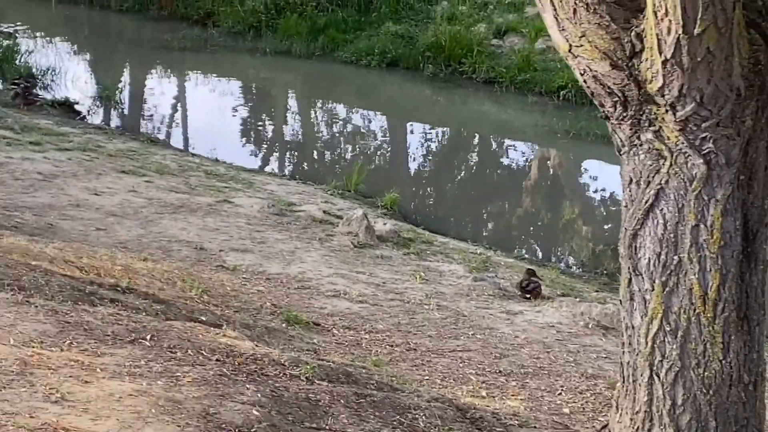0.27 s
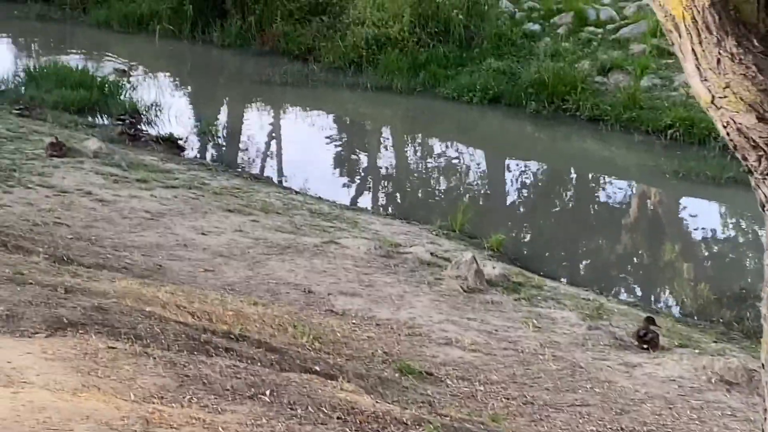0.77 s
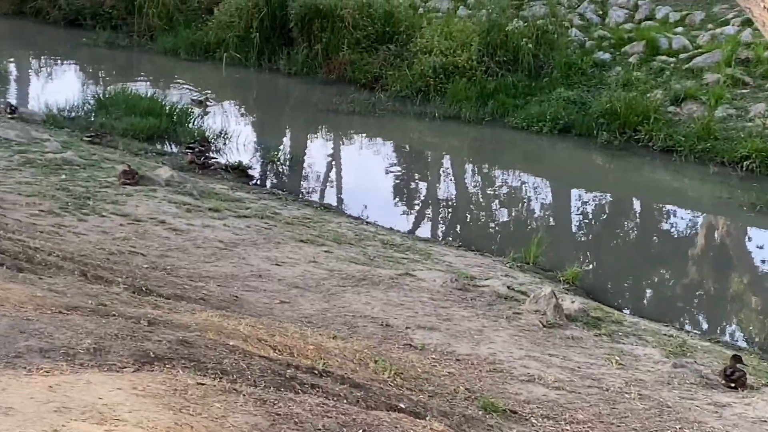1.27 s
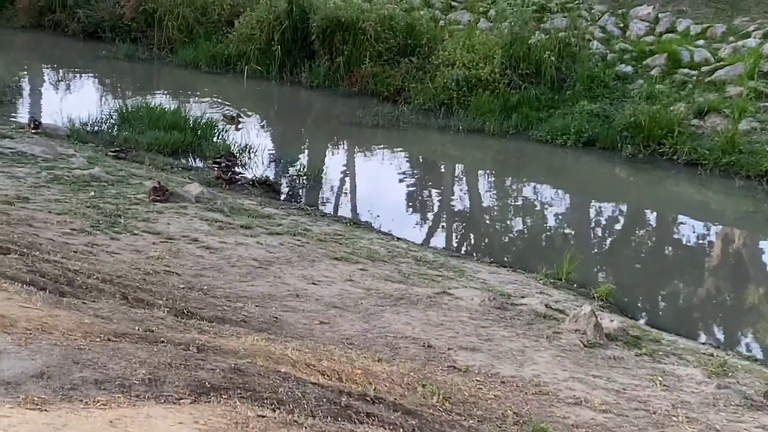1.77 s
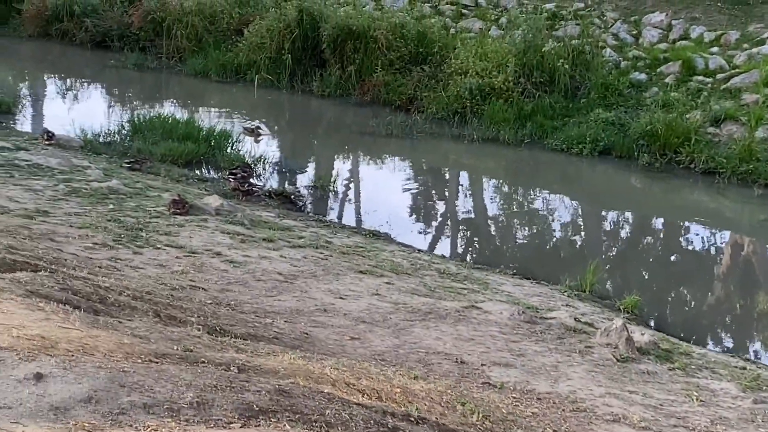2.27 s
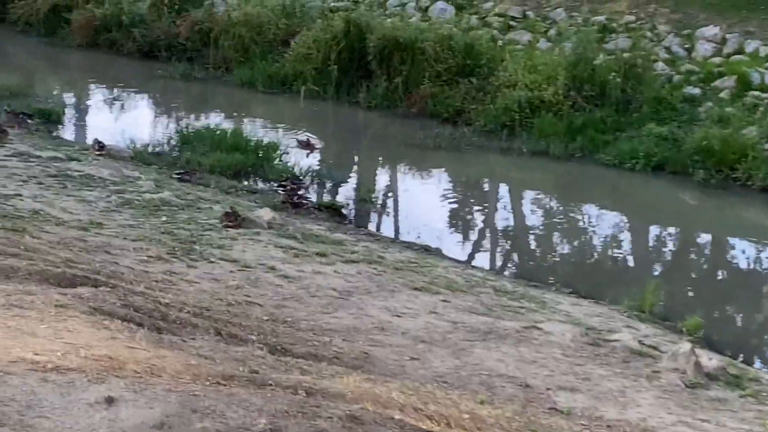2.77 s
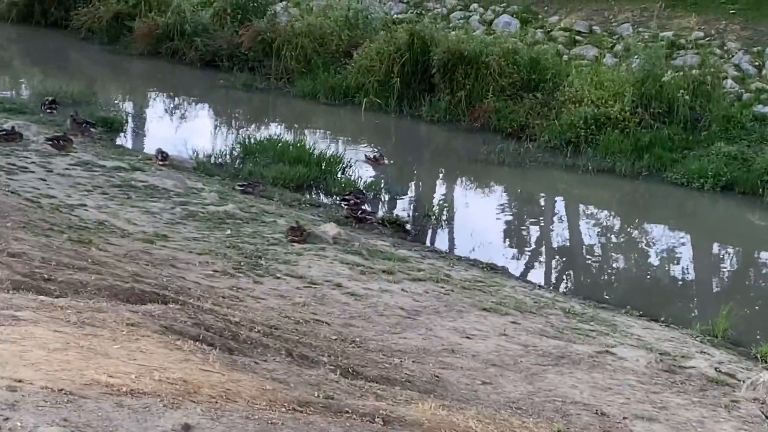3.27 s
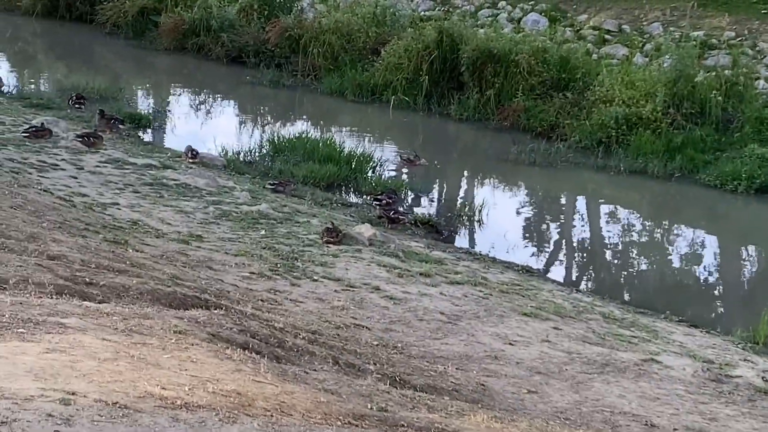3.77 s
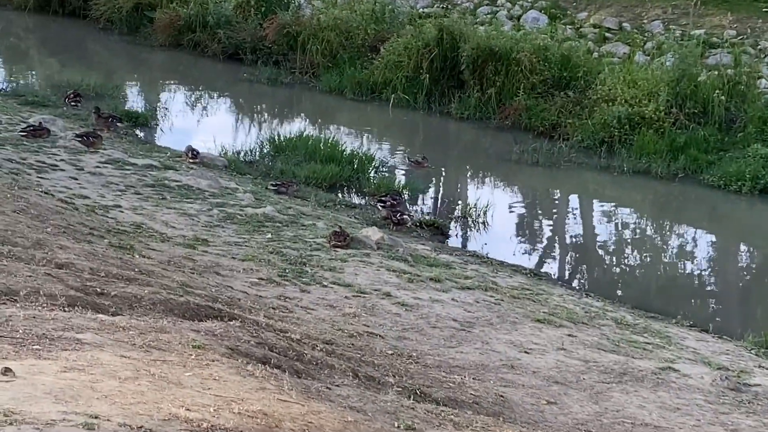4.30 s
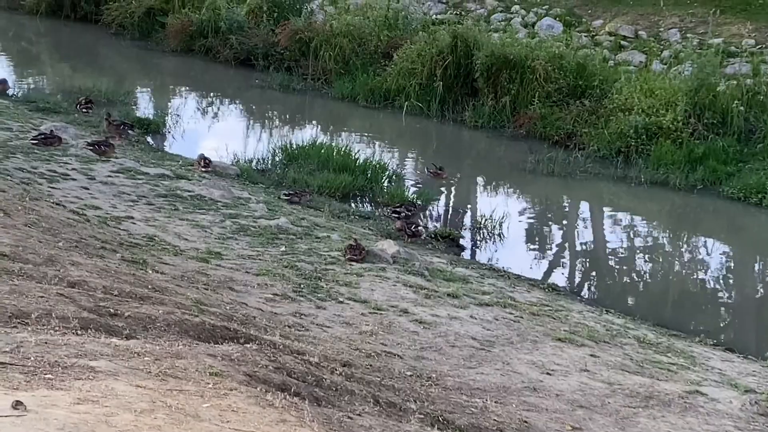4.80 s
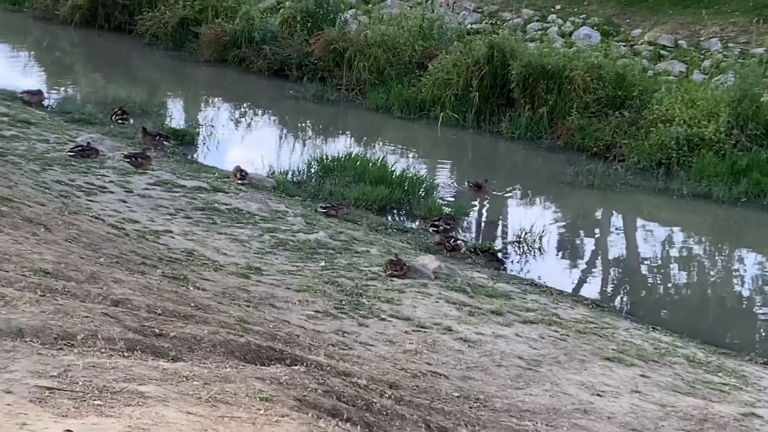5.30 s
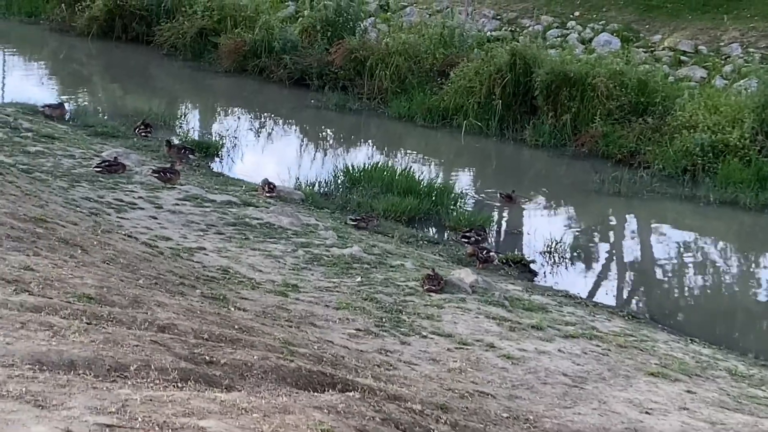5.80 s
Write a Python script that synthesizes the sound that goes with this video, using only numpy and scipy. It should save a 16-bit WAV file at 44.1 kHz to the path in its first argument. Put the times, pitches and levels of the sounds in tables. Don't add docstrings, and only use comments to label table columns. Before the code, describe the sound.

Outdoors on a dry bank beside water, a handheld microphone picks up soft irregular low thuds and close, dry snaps of grit and twigs. Sparrows chirp in quick arched phrases, blurred by echoes from trees. A low fluttering rumble swells and eases over steady far traffic, and a distant lorry revs up slowly and faintly towards the end.

```python
import sys
import numpy as np
from scipy import signal
from scipy.fft import rfft, irfft
from scipy.io import wavfile
from scipy.ndimage import uniform_filter1d

SR = 44100
rng = np.random.default_rng(int(sys.argv[2]) if len(sys.argv) > 2 else 0)


def put_to_file(sound):
    columns = np.atleast_2d(sound).T
    safe = np.clip(columns, -1, 1)
    whole_steps = np.round(safe * 32767)
    wavfile.write(sys.argv[1], SR, whole_steps.astype(np.int16))


def amplitude_ratio(level_db):
    exponent = np.asarray(level_db, float) / 20
    return 10 ** exponent


N = 266760
T = np.arange(N) / SR

# time_s, level_db
RUMBLE_SWELL = [
    (0.0, -33),
    (0.32, -37.5),
    (0.6, -30.5),
    (1.35, -39),
    (2.95, -31.5),
    (3.54, -38.5),
    (4.09, -36),
    (5.71, -39.5),
    (6.05, -36),
]
# pitch_hz, density_db (per Hz)
RUMBLE_COLOUR = [(12, -37.5), (20, -19), (49, 4.5), (76, 3), (126, -4.5), (199, -14), (350, -20.5),
                 (460, -50), (770, -120)]
# time_s, level_db
ROAD_SWELL = [
    (0.0, -45.5),
    (0.29, -46),
    (2.33, -44.5),
    (6.05, -45),
]
# pitch_hz, density_db (per Hz)
ROAD_COLOUR = [(120, -24.5), (200, -4.5), (362, -8.5), (487, -7.5), (573, -11), (948, -3.5), (1200, -10.5),
               (1500, -11.5), (2270, -20), (3870, -22.5), (5780, -28), (6500, -29), (6900, -41)]
# time_s, firing_hz, level_db
LORRY_REVS = [
    (0, 32.83, -48),
    (3.4, 37.04, -55),
    (4.4, 39.13, -49),
    (5.07, 41.54, -43),
    (5.6, 43.07, -50.5),
    (6.05, 44.14, -58),
]
# multiple (of firing_hz), level_db
LORRY_ORDERS = [(3, -14), (4, 2), (5, 1), (6, -2.5), (7, -18.5)]
# start_s, length_s, first_hz, last_hz, level_db
SLIDES = [(0.024, 0.036, 6940, 6440, -57), (0.05, 0.056, 4690, 3930, -56),
          (0.103, 0.046, 4400, 3190, -50.5), (0.174, 0.049, 3150, 4470, -48),
          (.178, 0.043, 3950, 5160, -53.5), (0.312, 0.016, 4700, 5270, -47.5),
          (.326, 0.03, 4500, 5940, -43), (0.933, 0.042, 5210, 4480, -53.5), (1.251, .024, 4400, 4080, -51),
          (1.275, 0.0082, 4300, 3300, -49), (2.713, .035, 4150, 4370, -55.5),
          (1.988, 0.022, 3770, 3900, -44), (2.293, 0.021, 4150, 4070, -44.5),
          (2.298, 0.042, 3450, 3410, -48.5), (2.357, 0.027, 3910, 4280, -49),
          (2.322, 0.045, 2740, 2993, -45.5), (4.894, 0.071, 4860, 4620, -60),
          (5.343, 0.036, 4530, 5030, -58), (5.382, .038, 3230, 4300, -53.5),
          (5.612, 0.041, 6100, 5450, -55), (5.613, 0.03, 4750, 3980, -55.5),
          (5.745, 0.021, 4240, 5330, -51), (5.832, .045, 5120, 4910, -51), (5.906, 0.02, 3240, 4440, -50)]
# start_s, length_s, pitch_hz, level_db
PIPES = [(.07, .045, 6570, -59), (.354, .062, 5980, -51), (.783, .045, 5300, -64), (1.15, .1, 5350, -66),
         (1.29, .06, 5690, -68), (1.37, .024, 4790, -59), (1.662, .04, 6360, -57.5), (1.95, .02, 5650, -58),
         (2.016, .1, 5555, -68), (2.13, .11, 5600, -69), (2.405, .046, 2920, -55), (2.68, .05, 5535, -65),
         (4.775, .04, 5650, -62), (5.128, .13, 5990, -68), (5.3, .026, 5265, -56), (5.299, .03, 6590, -60),
         (5.335, .04, 6600, -59), (5.565, .022, 5580, -63), (5.636, .03, 5590, -50), (5.69, .08, 5600, -61),
         (5.782, .022, 5950, -48.5), (5.8, .07, 6550, -67), (5.94, .03, 5950, -64)]
# start_s, length_s, first_hz, last_hz, level_db
CHATTER = [(0.052, 0.12, 4270, 3540, -48.5), (0.968, 0.14, 4200, 3800, -48),
           (1.268, 0.081, 3870, 3520, -56.5), (1.483, 0.13, 3870, 3690, -51),
           (1.834, 0.14, 4270, 3770, -49), (1.972, 0.31, 4200, 3940, -48.5),
           (2.292, 0.083, 3840, 3570, -56), (2.711, 0.11, 3830, 3520, -60),
           (3.254, 0.17, 4270, 3870, -58.5), (3.958, 0.2, 4480, 3885, -50), (4.131, 0.17, 3690, 3520, -54),
           (4.968, 0.12, 4200, 3850, -49), (5.166, 0.07, 3260, 3060, -57), (5.679, 0.33, 4180, 3960, -45.5)]
# start_s, peak_db, ring_hz, tick_db (above the ring)
SNAPS = [(0.2641, -29, 1750, -4), (0.5367, -11, 1240, -15), (0.5897, -22, 1360, -11),
         (0.7108, -32.5, 1340, 1), (1.454, -25.5, 1470, -12), (1.7916, -27.5, 1480, -10),
         (2.6173, -26, 1510, -8), (2.6232, -21, 1540, -24), (2.802, -20.5, 2060, -21),
         (2.8125, -23.5, 1350, -14), (2.8284, -27, 1370, -19), (2.928, -29, 1460, -20),
         (3.1176, -22.5, 1560, -12), (3.6122, -33, 1420, -13), (3.698, -28.5, 1380, -15),
         (3.828, -35, 1590, -15), (3.8564, -35, 1490, -8), (3.906, -23.5, 1470, -10),
         (3.9174, -26, 1560, -4.5), (4.5787, -29, 1430, -16), (4.684, -24, 1600, -32),
         (4.7441, -37, 1390, 6), (4.8549, -24, 1430, -8), (5.036, -22, 2300, -18), (5.4902, -24.5, 1640, 2),
         (5.6933, -23, 1450, -2.5), (6.0048, -21, 5560, -17), (6.008, -23, 3430, -15),
         (6.0154, -34, 3040, -13), (6.0434, -14.5, 5960, -10)]
# start_s, length_s, level_db, centre_hz
CRUNCHES = [
    (2.609, 0.023, -33, 1820),
    (2.615, .016, -41.5, 650),
    (3.575, 0.024, -36.5, 3360),
    (3.773, 0.11, -41, 2600),
    (4.459, 0.024, -43.5, 2800),
    (4.505, 0.21, -62, 2500),
    (5.468, .022, -37.5, 2940),
    (5.669, 0.015, -44, 2030),
    (6.009, 0.0066, -34.5, 4500),
    (6.0425, 0.0054, -37.5, 4540),
]
# centre_s, peak_db, pitch_hz, length_s
THUDS = [(0.31, -29, 63.5, 0.016), (0.367, -27.5, 57.6, 0.023), (0.477, -20, 62, 0.015),
         (0.495, -14, 96.4, 0.0053), (0.535, -21, 98, 0.04), (0.617, -17, 63, 0.0069),
         (0.67, -16.5, 77.6, 0.021), (0.72, -15.5, 124, 0.01), (0.81, -14.5, 70, 0.017),
         (0.845, -17, 93, 0.023), (1.142, -27, 72.5, 0.017), (1.932, -24.5, 109, 0.0095),
         (1.974, -24, 75, 0.031), (2.08, -22.5, 73, 0.0098), (2.126, -20, 92.3, 0.017),
         (2.175, -26.5, 69, 0.024), (2.267, -17.5, 77.6, 0.028), (2.382, -22, 88, 0.014),
         (2.556, -20.5, 74, 0.034), (2.623, -25, 94.5, 0.036), (2.72, -29, 110, 0.0096),
         (2.839, -16.5, 87, 0.0093), (2.898, -18, 92, 0.0093), (2.953, -13.5, 88, 0.019),
         (3.065, -17, 118, 0.016), (3.249, -28, 80, 0.021), (3.279, -18, 92, 0.015),
         (4.314, -21, 69, 0.027), (4.352, -15.5, 72, 0.026)]
# delay_s, length_s, first_hz, top_hz, last_hz
SYLLABLES = [
    (-.002, .06, 3177, 5000, 3220),
    (0.071, 0.051, 2560, 3850, 3050),
    (0.128, 0.042, 3410, 5000, 3600),
    (.2, 0.052, 2717, 4100, 3050),
]
# start_s, first_db, second_db, third_db, dip_db (at the tops, when it faces away)
PHRASES = [
    (.9545, -47, -55, -55.5, 1.5),
    (1.9658, -44.5, -48.5, -56, 4),
    (3.241, -42.5, -40.5, -49.5, 12),
    (3.953, -42.5, -39, -47, 12),
    (4.964, -42, -46.5, -43, 2.5),
    (5.679, -45.5, -46.5, -50.5, 3.6),
]
# start_s, length_s, top_hz, level_db
CHIRPS = [(1.281, 0.058, 4100, -51.5), (1.466, 0.069, 4650, -46.5), (1.847, 0.13, 4700, -54.5),
          (2.061, 0.059, 5690, -46), (2.121, 0.049, 4290, -41), (2.173, 0.036, 3760, -59),
          (2.743, 0.063, 4140, -49.5), (4.207, 0.09, 4110, -54.5), (5.691, 0.063, 4040, -56),
          (5.904, 0.054, 4930, -50.5), (2.285, 0.054, 4250, -51.5), (2.367, 0.037, 4330, -56)]


def curve(table):
    time_s, *columns = np.transpose(table)
    return [np.interp(T, time_s, column) for column in columns]


def unit(x):
    return x / np.sqrt(np.mean(x ** 2))


def add(out, start_s, piece):
    i = int(np.clip(start_s * SR, 0, N))
    out[i:i + len(piece)] += piece[:N - i]


def walk(rate_hz):
    hold = int(SR / rate_hz)
    steps = np.repeat(rng.standard_normal(N // hold + 1), hold)
    return 0.73 * uniform_filter1d(uniform_filter1d(steps, hold), hold)[:N]


def restless(colour, flicker_db, rate_hz):
    pitch_hz, density_db = np.transpose(colour)
    octave = np.log2(np.arange(1, N // 2 + 2) * SR / N)
    density = amplitude_ratio(np.interp(octave, np.log2(pitch_hz), density_db, left=-99))
    spectrum = rfft(rng.standard_normal(N)) * density
    out = 0
    for centre in np.arange(4, 13.5, .5):
        share = np.clip(1 - 2 * abs(octave - centre), 0, 1)
        out = out + amplitude_ratio(flicker_db * walk(rate_hz)) * irfft(spectrum * share, N)
    return out


def breeze_rumble():
    level = amplitude_ratio(curve(RUMBLE_SWELL)[0] + 2.5)
    return level * unit(restless(RUMBLE_COLOUR, flicker_db=5.5, rate_hz=14))


def road():
    level = amplitude_ratio(curve(ROAD_SWELL)[0] + 3.0)
    return level * unit(restless(ROAD_COLOUR, flicker_db=1.9, rate_hz=7.2))


def lorry():
    firing_hz, level_db = curve(LORRY_REVS)
    phase = 2 * np.pi * np.cumsum(firing_hz * (1 + 0.0069 * walk(4.4))) / SR
    engine = 0
    for order, order_db in LORRY_ORDERS:
        engine = engine + amplitude_ratio(order_db + 1.8 * walk(4)) * np.sin(order * phase + order * order)
    return amplitude_ratio(level_db) * engine


def slide(length_s, first_hz, last_hz, bend=.6):
    eased = np.expm1(-bend * np.linspace(0, 1, int(length_s * SR))) / np.expm1(-bend)
    return first_hz + (last_hz - first_hz) * eased


def whistle(pitch_hz, wobble_db):
    u = np.linspace(0, 1, len(pitch_hz))
    unsteady = np.interp(u * len(pitch_hz) / SR * 250, np.arange(64), rng.standard_normal(64))
    swell = np.sin(np.pi * u) ** 0.32
    return swell * amplitude_ratio(wobble_db * unsteady) * np.sin(2 * np.pi * np.cumsum(pitch_hz) / SR)


def slides_and_pipes():
    out = np.zeros(N)
    pipes = [(start_s, length_s, hz, hz, level_db) for start_s, length_s, hz, level_db in PIPES]
    for start_s, length_s, first_hz, last_hz, level_db in SLIDES + pipes:
        stroke = whistle(slide(length_s, first_hz, last_hz), wobble_db=1.5 + 35 * length_s)
        add(out, start_s, amplitude_ratio(level_db + 7.5) * stroke)
    return out


def flock_chatter():
    out = np.zeros(N)
    for start_s, length_s, first_hz, last_hz, level_db in CHATTER:
        for place, pitch, slope, size in rng.random((60, 4)):
            hz = first_hz + (last_hz - first_hz) * place + 2400 * (pitch - .52)
            glide_hz = 1300 * (slope - .55)
            stroke = whistle(slide(0.01814, hz - glide_hz, hz + glide_hz), wobble_db=2.1)
            add(out, start_s + place * length_s, amplitude_ratio(level_db - 2.5 - 7.3 * size) * stroke)
    return out


def trees(x, t60_s, gap_s, sparse_db):
    t = T[:int(.8 * SR)]
    patches = np.repeat(rng.standard_normal(len(t) // 64 + 1), 64)[:len(t)]
    decay = amplitude_ratio(sparse_db * patches - 60 * t / t60_s)
    echoes = rng.standard_normal(len(t)) * decay * (1 - np.exp(-t / gap_s))
    return signal.fftconvolve(x, echoes / np.sqrt(np.sum(echoes ** 2)))[:N]


def ring(pitch_hz, t60_s):
    t = T[:int(t60_s * SR) + 8]
    contact = 1 - np.exp(-t * pitch_hz * 9)
    return np.sin(2 * np.pi * pitch_hz * t) * amplitude_ratio(-60 * t / t60_s) * contact * 1.52


def grit():
    out = np.zeros(N)
    for start_s, peak_db, ring_hz, tick_db in SNAPS:
        add(out, start_s + .0006, amplitude_ratio(peak_db - 2.0) * ring(ring_hz, 2.2 / ring_hz + 0.0016))
        add(out, start_s + .0006, amplitude_ratio(peak_db + tick_db + 6.5) * ring(2800, 0.0009))
    for start_s, length_s, level_db, centre_hz in CRUNCHES:
        for k, (shift, size, pitch) in enumerate(rng.random((20, 3))):
            place = (k + shift) / 20
            grain_hz = np.clip(centre_hz * 2 ** (2.4 * (pitch - .5)), 300, 6800)
            grain = np.sin(np.pi * place) ** .6 * ring(grain_hz, 5.5 / grain_hz)
            grain_db = level_db + 6 - 2.6 * np.log(size + .08)
            add(out, start_s + place * length_s, amplitude_ratio(grain_db) * grain)
    return out


def thuds():
    out = np.zeros(N)
    turns = rng.random((len(THUDS), 2))
    for (centre_s, peak_db, pitch_hz, length_s), (turn, turn2) in zip(THUDS, turns):
        t = T[:int(4 * length_s * SR)] - 2 * length_s
        phase = 2 * np.pi * pitch_hz * (t - 1.9 * t ** 2)
        push = np.cos(phase + 2 * np.pi * turn) + 0.2 * np.cos(1.747 * phase + 2 * np.pi * turn2)
        swell = np.exp(-2.6 * (t / length_s) ** 2)
        add(out, centre_s - 2 * length_s, amplitude_ratio(peak_db + 1.83) * swell * push)
    return out


def arch(length_s, first_hz, top_hz, last_hz, dip_db):
    rise_share = .38
    rise = slide(length_s * rise_share, first_hz, top_hz, bend=1.197)
    fall = slide(length_s * (1 - rise_share), top_hz, last_hz, bend=2.6)
    hz = np.r_[rise, fall]
    t = T[:len(hz)]
    dip = dip_db * np.exp(-((np.linspace(0, 1, len(hz)) - rise_share) / .075) ** 2)
    beak_db = -8 * abs(np.log2(hz / 3450))
    push_db = 3 * (np.gradient(hz) > 0)
    onset = 1 - np.exp(-(t / .006) ** 2)
    overtone = amplitude_ratio(-13) * whistle(2 * hz, wobble_db=2.5) * np.exp(-t / .008)
    return amplitude_ratio(push_db - dip + beak_db) * whistle(hz, wobble_db=4.8) * onset + overtone


def sparrow_phrases():
    out = np.zeros(N)
    for start_s, *levels_db, dip_db in PHRASES:
        last_db = -54.5
        for level_db, (delay_s, *shape) in zip(levels_db + [last_db], SYLLABLES):
            add(out, start_s + delay_s, amplitude_ratio(level_db + 7.5) * arch(*shape, dip_db))
    return out


def lone_chirps():
    out = np.zeros(N)
    for start_s, length_s, top_hz, level_db in CHIRPS:
        chirp = arch(length_s, .64 * top_hz, top_hz, .66 * top_hz, dip_db=3.5)
        add(out, start_s, amplitude_ratio(level_db + 7.5) * chirp)
    return out


def scene():
    background = breeze_rumble() + road() + lorry()
    notes = slides_and_pipes() + sparrow_phrases() + lone_chirps()
    flock = flock_chatter()
    steps = grit()
    leaves = trees(amplitude_ratio(-6) * notes + amplitude_ratio(-1.5) * flock, t60_s=.035, gap_s=.001, sparse_db=2)
    to_echo = amplitude_ratio(-5.5) * notes + amplitude_ratio(-4.0) * flock + amplitude_ratio(-14.5) * steps
    echo = trees(to_echo, t60_s=0.4, gap_s=0.0099, sparse_db=8.5)
    return (background + amplitude_ratio(-3.0) * notes + leaves + echo + steps + thuds())[None]


def band_limit(x):
    return signal.sosfilt(signal.butter(12, 8040, fs=SR, output="sos"), x)


def record(dry):
    top_cut = signal.ellip(12, .2, 70, 6980, fs=SR, output="sos")
    mix = signal.sosfilt(top_cut, dry)
    return band_limit(mix)


dry = scene()
out = record(dry)
put_to_file(out)
```